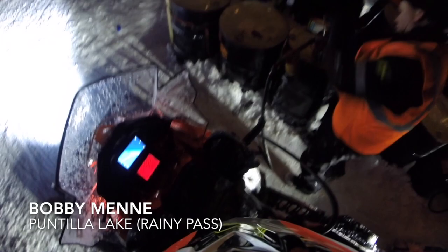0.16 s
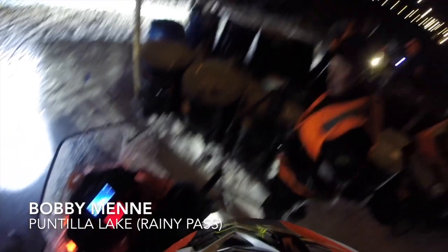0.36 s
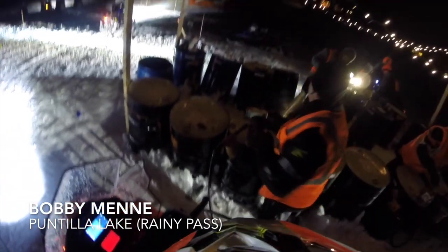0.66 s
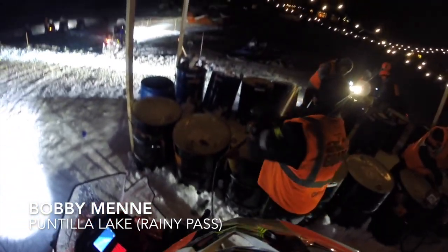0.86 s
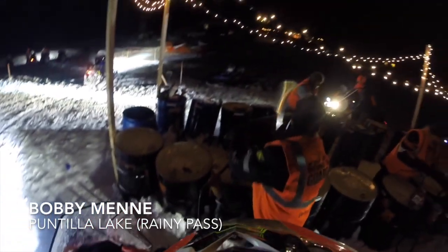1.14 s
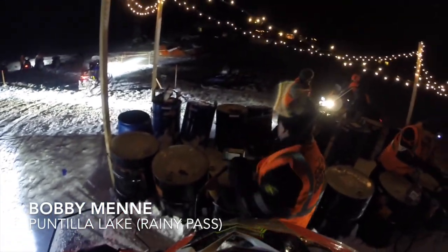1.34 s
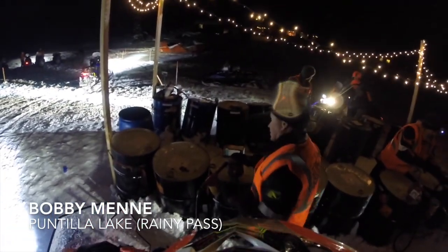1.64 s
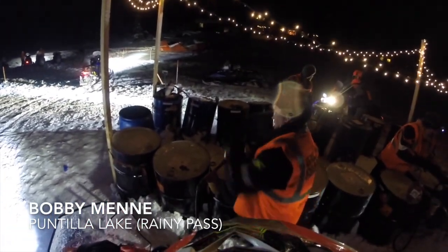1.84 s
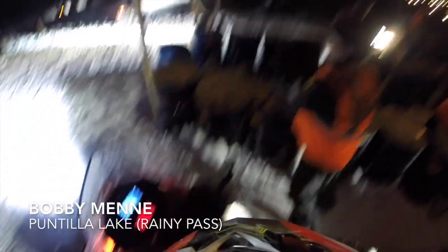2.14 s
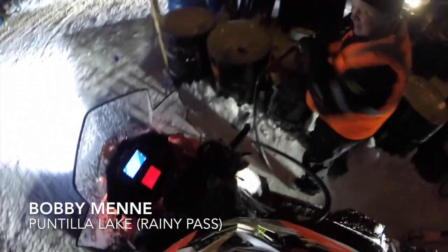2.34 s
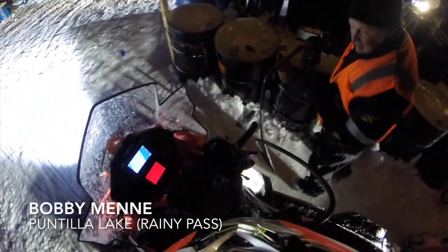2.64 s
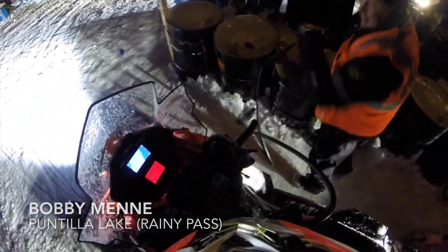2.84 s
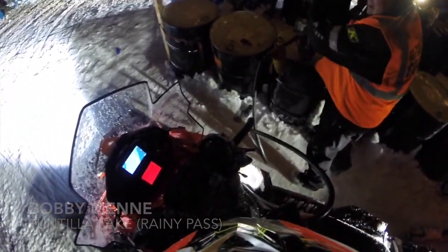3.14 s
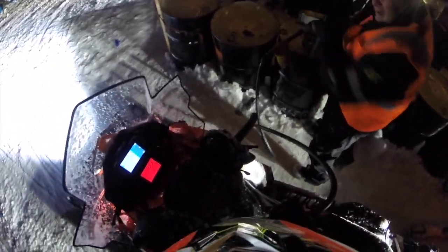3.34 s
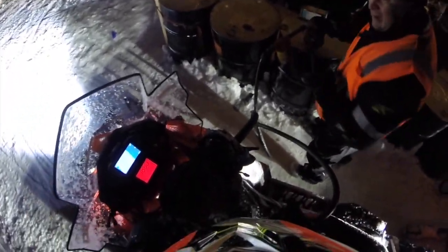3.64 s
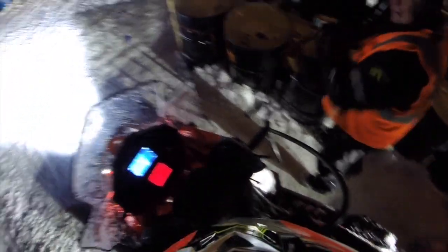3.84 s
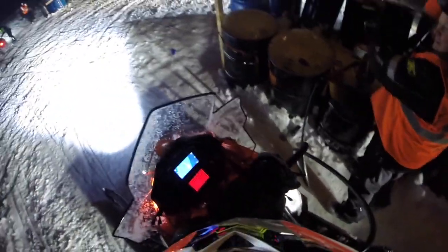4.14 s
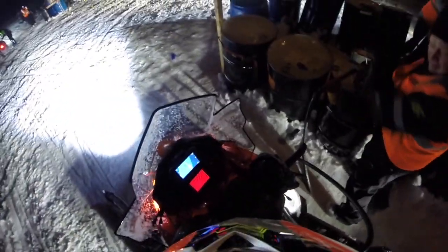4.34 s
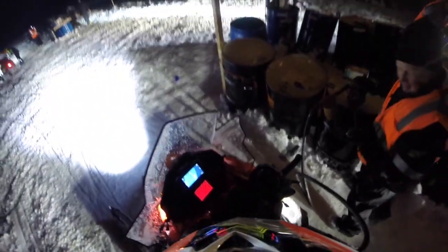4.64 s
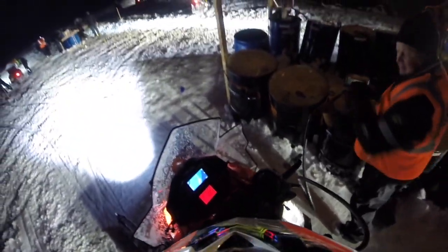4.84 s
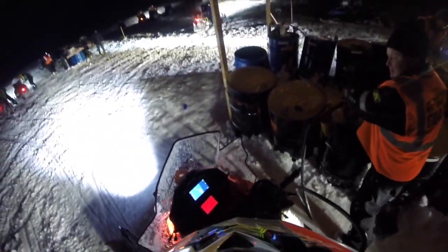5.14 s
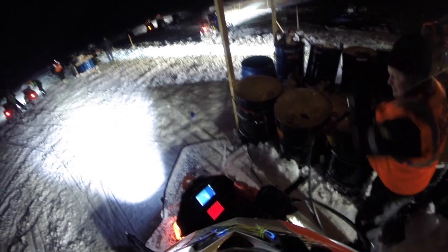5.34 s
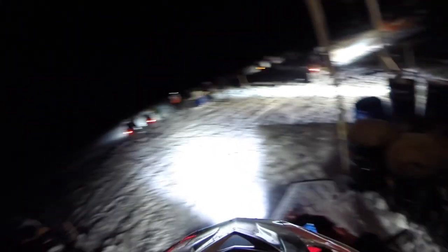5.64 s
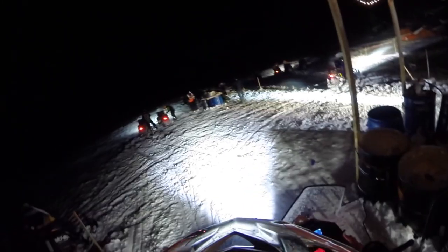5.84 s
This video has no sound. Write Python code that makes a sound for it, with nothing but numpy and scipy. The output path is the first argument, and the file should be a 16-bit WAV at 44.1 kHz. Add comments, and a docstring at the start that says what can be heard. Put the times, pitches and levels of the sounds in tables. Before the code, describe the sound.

Outdoors on open snow, a snowmobile idles steadily right below a body-worn microphone: low uneven putter, fine metallic clatter, rushing air. The hum dips and returns as the wearer's head turns. Hollow knocks hit the camera mount, a hard double metal clank rattles just after two seconds, and tiny clicks and cloth rustles are scattered over it. Dry, no echo.

```python
"""At a fuel stop on the snow at night, a snowmobile idles, heard from a camera worn by its rider.
Puffs and tones make its exhaust, taps on metal its clatter and shaped noise its rushing air; another machine drones
farther off as two wavering tones. Fading tones make hollow knocks on the camera mount, a metal clank and rattle by
the fuel drums, and clicks of small fittings. Crackling noise is clothing; a thin whistle is the camera's electronics."""
import sys
import numpy as np
from scipy import signal
from scipy.fft import rfft, irfft
from scipy.io import wavfile

SR = 44100
rng = np.random.default_rng(int(sys.argv[2]) if len(sys.argv) > 2 else 0)


def generate_wav(sig):
    """Save sig (samples, or channels by samples) to the path in sys.argv[1] as 16-bit PCM at SR."""
    pcm = np.round(np.clip(np.atleast_2d(sig).T, -1, 1) * 32767).astype(np.int16)
    wavfile.write(sys.argv[1], SR, pcm)


N = 264159
TIME = np.arange(N) / SR   # [s]

# idle speed of the crankshaft, before its small wander: (time [s], speed [turns per s])
CRANK_SPEED = [(0.0, 27.4), (0.2, 27.5), (0.65, 28.4), (1.6, 28.7), (2.4, 27.2), (2.7, 29.1), (3.2, 27.4),
               (4.5, 27.7), (5.1, 26.7), (5.6, 27.5), (5.99, 27.4)]
# how far the rider's head is turned down towards the engine: (time [s], share [0-1])
HEAD_FACING = [(0, 0.93), (.2, 1), (.5, 0.66), (1.25, 0.0), (1.52, 0.62), (1.95, 0.14), (2.25, 1),
               (2.65, 0.63), (3.15, .95), (4.0, 0.79), (5.2, 0.47), (5.99, 0)]
# clean exhaust tones, relative: (multiple of crank speed [-], level [dB])
EXHAUST_TONES = [(1, -12), (2, -5.5), (4, -12), (5, -16), (7, -29.5), (8, -38.5), (10, -18.5)]
# pipe and hood resonances, relative: (frequency [Hz], width [Hz], level [dB])
PIPE_RESONANCES = [(52.4, 14.3, -2), (128, 31.4, -1), (220, 47, -14), (273, 28, -11), (423.5, 17.5, -15),
                   (559, 38, -22), (878, 61, -21), (1107, 33, -16.5)]
# engine block and clutch resonances, relative: (frequency [Hz], width [Hz], level [dB])
BLOCK_RESONANCES = [(1416, 110, -4.5), (1575, 114, 2), (2040, 27, -7), (2250, 460, -6.5), (2503, 320, -10),
                    (3043, 110, -7), (3340, 184, -7.5), (3530, 110, -11), (5490, 430, -19),
                    (5900, 346, -18), (5960, 140, -26.5)]
# colour of the air from fan, belt and intake, relative: (frequency [Hz], level [dB per Hz])
RUSH_COLOUR = [(20, 6), (40, -4), (100, -3.5), (200, -8.5), (350, -20.5), (750, -20), (1250, -18),
               (2400, -9), (3400, -26.5), (4200, -21), (6200, -31.5), (7500, -30.5), (10000, -32.5),
               (12500, -42), (15000, -42)]
# drone of the farther machine, before its swell: (frequency [Hz], level [dB rms])
FAR_DRONE = [(38.2, -58), (76.4, -57.5)]
# movements of stiff winter clothing, relative: (time of the middle [s], level [dB])
CLOTH_RUBS = [(1.42, -53), (2.143, -49), (3.026, -51.5), (3.225, -51), (3.285, -49.5), (4.0, -52),
              (4.56, -53), (4.725, -51)]
# colour of the clothing, relative: (frequency [Hz], level [dB per Hz])
CLOTH_COLOUR = [(300, 4), (900, 5.5), (1500, -1.5), (2500, 11), (3400, -1), (4300, -14), (6000, -14.5),
                (10000, -20.5), (15000, -30)]
# clicks of small fittings, relative: (time [s], level [dB], pitch [Hz], time to fall 60 dB [s])
FITTING_CLICKS = [(.056, -44, 3060, .11), (.1355, -36, 2280, 0.022), (.598, -46.5, 5700, .02),
                  (.659, -42.5, 3100, .11), (.815, -44, 3260, 0.053), (1.405, -51, 6640, .018),
                  (1.850, -38.5, 3387, 0.058), (2.344, -35, 2690, 0.023), (2.548, -40.5, 2490, .018),
                  (2.711, -45, 6020, .018), (3.209, -38.5, 2310, 0.067), (3.653, -41, 3090, 0.05),
                  (3.891, -41, 3520, 0.031), (5.316, -41, 3450, 0.12), (5.329, -47, 2514, .44)]
# bumps on the camera mount, relative: (time [s], level [dB])
MOUNT_BUMPS = [(0.138, -12.5), (2.091, -36), (2.241, -15), (2.713, -16.5), (3.197, -16), (3.428, -37),
               (3.849, -19), (4.478, -37), (4.503, -31), (5.405, -36.5)]
# ringing modes of the mount; a weaker one close to the main one lingers and beats:
# (multiple of the mount's pitch [-], level [dB], multiple of the knock's fall time [-])
MOUNT_MODES = [(.32, -23, 1.2), (.99, -2, 1.05), (1.07, -14, 2.2), (1.54, -16, 1.3)]
# blows of the clank, two hard and two light, relative: (time [s], level [dB], brightness [Hz])
CLANK_BLOWS = [(2.1975, -22, 1990), (2.221, -26.5, 4300), (2.2773, -38, 4800), (2.316, -49, 3800)]
# ringing modes of the struck metal, relative: (frequency [Hz], level [dB], time to fall 60 dB [s])
METAL_MODES = [(415, -19, .4), (495, -17, .35), (615, -5, .3), (876, -8, .25), (905, -16, 1.0),
               (1101, -14, .35), (1350, -16, .4), (1523, -4, .15), (1612, -5, .18), (1679, -1, .22),
               (1716, -4, .22), (1878, -10, .3), (2003, -9, .22), (2125, -9, .25), (2255, -5, .25),
               (2308, -2, .26), (2358, -7, .3), (2504, -7, .25), (2590, -7, .27), (2708, -8, .28),
               (2802, -7, .33), (3122, -13, .2), (3289, -9, .09), (3390, -15, .2)]
# colour of its dense upper modes, relative: (frequency [Hz], level [dB per Hz])
CRASH_COLOUR = [(250, -8), (500, -8), (1200, -6), (1700, 2), (2600, 3.5), (3400, -6.5), (4200, -18.5),
                (6000, -17.5), (10000, -13), (15000, -16)]

SPEED_WANDER_SHARE, SPEED_WANDER_HZ = .005, 6.0   # the idle hunts around its set speed
# gains facing the engine, and what each loses when the head is fully turned away
EXHAUST_DB, EXHAUST_AWAY_DB = -48.5, 0.25
HUM_DB, HUM_AWAY_DB = -56, 20.5
CLATTER_DB, CLATTER_AWAY_DB = -49, 5
RUSH_DB, RUSH_AWAY_DB = -54, 2.6
WHINE_HZ, FRAME_HZ = 6450, 30
RUSTLE_HALF_S, STIR_DB = 0.022, -69   # half-width of a rustle; middle level of the faint stirring
OVERTONE_RATIO, OVERTONE_DB = 2.07, -16.0   # second mode of each fitting
FAINT_DB, FAINT_T60_S, FAINT_LOW_HZ, FAINT_HIGH_HZ = -52, 0.04, 2150, 6500
MOUNT_HZ = 122.8
HARD_KNOCK_DB, HARD_KNOCK_T60_S = -15.5, 0.087   # the mount's padding damps hard bumps quickly
RING_DOUBLING_DB = 20.5   # a bump this much softer rings twice as long
REBOUND_S, REBOUND_LOSS_DB = .122, 25   # the camera settles back after each bump
BOUNCE_S, BOUNCE_GAIN_DB = .0055, 1.5   # each blow lands again, a little louder
RATTLE_GAP_S, RATTLE_BELOW_DB, RATTLE_BRIGHT_HZ = 0.03, 28, 4500   # then come light touches
CUTOFF_HZ = 15200


def from_db(db):
    """Turn decibels into a multiplier."""
    return 10 ** (np.asarray(db) / 20)


def rms_one(x):
    """Scale to an rms (average strength) of 1."""
    return x / np.sqrt(np.mean(x ** 2) + 1e-20)


def in_time(rows):
    """Draw straight lines between a table's rows, sample by sample."""
    s, *columns = np.transpose(rows)
    return [np.interp(TIME, s, c) for c in columns]


def drift(rate):
    """Random wander with rms 1; a higher rate [Hz] wanders faster."""
    step = 40   # work on every 40th sample, then fill in between
    r = np.exp(-2 * np.pi * rate * step / SR)
    noise = rng.standard_normal(N // step + 2002)
    slow = signal.lfilter([1], [1, -2 * r, r * r], noise)[2000:]   # drop the start-up
    return np.interp(np.arange(N) / step, np.arange(len(slow)), rms_one(slow))


def coloured(spectrum):
    """Steady noise with the given balance of low and high, rms 1."""
    hz, db = np.transpose(spectrum)
    bins = np.maximum(np.fft.rfftfreq(N, 1 / SR), 1)
    gain = from_db(np.interp(np.log(bins), np.log(hz), db))
    gain = gain * np.minimum(bins / hz[0], 1) ** 2   # fade out below the first row
    return rms_one(irfft(rfft(rng.standard_normal(N)) * gain, N))


def resonate(x, hz, width):
    """Let a resonance ring, with gain 1 at its peak."""
    r = np.exp(-np.pi * width / SR)
    top = np.array([1, 0, -1]) * (1 - r * r) / 2
    return signal.lfilter(top, [1, -2 * r * np.cos(2 * np.pi * hz / SR), r * r], x + 1e-18)


def low_pass(x, hz, order=2):
    """Soften what lies above hz."""
    return signal.sosfilt(signal.butter(order, min(hz, .45 * SR), fs=SR, output="sos"), x)


def band_pass(x, low_hz, high_hz):
    """Keep mainly what lies between two frequencies."""
    band = [low_hz, min(high_hz, .45 * SR)]
    return signal.sosfilt(signal.butter(2, band, "band", fs=SR, output="sos"), x)


def dying(t, t60):
    """Fade that falls 60 dB in t60 seconds."""
    return np.exp(-np.log(1000) * t / t60)


def add(out, s, sound):
    """Mix a short sound in at time s."""
    i = round(s * SR)
    out[i:i + len(sound)] += sound[:N - i]


def exhaust(turns, uneven_db=1.5, turbulence=0.25, pulses_db=-3.0, waver_db=2.0):
    """Two firings a turn, of uneven strength, puff into the ringing pipe beside clean tones."""
    firing = np.diff(np.floor(2 * turns + .05 * drift(25)), prepend=0) > 0
    strength = from_db(uneven_db * drift(23.6))
    puff = np.exp(-1.5 * (2 * turns % 1))
    pipe = np.zeros(N)
    for hz, width, db in PIPE_RESONANCES:
        gas = strength * (firing + turbulence * puff * rng.standard_normal(N))
        pipe += from_db(db) * resonate(gas, hz, width)
    tones = np.zeros(N)
    for k, db in EXHAUST_TONES:
        level = from_db(db + waver_db * drift(2.2))
        tones += level * np.sqrt(2) * np.sin(2 * np.pi * (k * turns + rng.random()))
    return from_db(pulses_db) * rms_one(low_pass(pipe, hz=1440)) + tones


def airbox(turns, order=14):
    """The seventh harmonic of the firing rate hums, wavering with uneven firing times and strengths."""
    lead = .17 * drift(12)   # [cycles]
    waver_db = 3 * drift(14) - 1.5
    return from_db(waver_db) * np.sqrt(2) * np.sin(2 * np.pi * (order * turns + lead))


def clatter(turns, taps_per_s=3500, throb=0.17, flutter_db=1.5):
    """Valve gear and clutch tap densely on the ringing block, harder once a turn."""
    taps = rng.random(N) < taps_per_s / SR
    force = taps * (1 + throb * np.cos(2 * np.pi * turns)) * from_db(flutter_db * drift(4.2))
    block = np.zeros(N)
    for hz, width, db in BLOCK_RESONANCES:
        ring = resonate(force * rng.standard_normal(N), hz, 1.1 * width)
        block += from_db(db) * resonate(ring, hz, 4 * width)
    return rms_one(block)


def rush(turns, throb=0.17, flutter_db=1.0):
    """Air from fan, belt and intake rushes as noise, pulsing with the firings."""
    pulsing = 1 + throb * np.cos(4 * np.pi * turns)
    return coloured(RUSH_COLOUR) * pulsing * from_db(flutter_db * drift(18))


def snowmobile():
    """The crank drives every engine sound; each fades by its own amount as the rider looks away."""
    speed = in_time(CRANK_SPEED)[0] * (1 + SPEED_WANDER_SHARE * drift(SPEED_WANDER_HZ))
    turns = np.cumsum(speed) / SR
    away = 1 - in_time(HEAD_FACING)[0]
    return (from_db(EXHAUST_DB - EXHAUST_AWAY_DB * away) * exhaust(turns)
            + from_db(HUM_DB - HUM_AWAY_DB * away) * airbox(turns)
            + from_db(CLATTER_DB - CLATTER_AWAY_DB * away) * clatter(turns)
            + from_db(RUSH_DB - RUSH_AWAY_DB * away) * rush(turns))


def far_machine(waver=0.0134, swell_db=6.5):
    """Only the wavering drone of the other engine carries across the snow."""
    clock = np.cumsum(1 + waver * drift(2.05)) / SR
    drone = sum(from_db(db) * np.sqrt(2) * np.sin(2 * np.pi * hz * clock) for hz, db in FAR_DRONE)
    return from_db(swell_db * drift(2.9)) * drone


def camera_whine(low_db=-72.0, high_db=-79.5):
    """The electronics give an unsteady whistle and its octave, pulsing with the frame rate."""
    phase = 2 * np.pi * np.cumsum(WHINE_HZ + 22 * drift(68.0)) / SR
    frame = 2 * np.pi * FRAME_HZ * TIME
    pulsing = 1 + .55 * np.cos(frame) - .25 * np.cos(2 * frame) - .45 * np.cos(3 * frame)
    return pulsing * (from_db(low_db) * np.sin(phase) + from_db(high_db) * np.sin(2 * phase))


def clothing(level_db=-1.0, stir_swing_db=4.5):
    """Each movement rubs out a short swell of fine crackle; the cloth stirs faintly throughout."""
    swell = sum(from_db(db) * np.exp(-2 * ((TIME - s) / RUSTLE_HALF_S) ** 2) for s, db in CLOTH_RUBS)
    stir = from_db(STIR_DB + stir_swing_db * drift(4.7))
    crackle = rms_one(coloured(CLOTH_COLOUR) * from_db(3 * drift(200)))
    return (from_db(level_db) * swell + stir) * crackle


def faint_clicks(count=10):
    """Small clicks at random times and pitches, as rows like those of FITTING_CLICKS."""
    rows = []
    for when, pitch in rng.random((count, 2)):
        hz = FAINT_LOW_HZ * (FAINT_HIGH_HZ / FAINT_LOW_HZ) ** pitch
        rows.append((when * TIME[-1], FAINT_DB, hz, FAINT_T60_S))
    return rows


def fittings(snap_t60=0.052, ring_db=1.5, snap_db=-6.0, snap_loss_db=2.0, contact_s=0.0005, buzz=0.41,
             top_hz=7500):
    """A small part snaps, rings and buzzes in its loose seat; the longer it rings, the less it snaps."""
    out, t = np.zeros(N), TIME[:SR // 4]
    for s, db, hz, t60 in list(FITTING_CLICKS) + faint_clicks():
        grit, chatter = rng.standard_normal((2, len(t)))
        buzzing = buzz * rms_one(resonate(chatter, hz, 240))
        tone = (np.sin(2 * np.pi * hz * t) + buzzing) * dying(t, t60)
        overtone = from_db(OVERTONE_DB) * np.sin(2 * np.pi * OVERTONE_RATIO * hz * t) * dying(t, t60 / 2)
        snap_gain = from_db(snap_db - snap_loss_db * np.log2(t60 / snap_t60))
        snap = rms_one(band_pass(grit, 0.63 * hz, 1.05 * hz)) * dying(t, snap_t60) * snap_gain
        click = from_db(ring_db) * (tone + overtone) + low_pass(snap, top_hz)
        add(out, s, from_db(db) * click * (1 - np.exp(-t / contact_s)))
    return out


def knocks(swell_s=0.011, level_db=6.5):
    """A bump swells the mount's modes into ringing, and a soft rebound follows it."""
    out, t = np.zeros(N), TIME[:SR]
    bumps = list(MOUNT_BUMPS)
    for s, db in MOUNT_BUMPS:
        delay = REBOUND_S * (1 + 0.0872 * rng.standard_normal())
        bumps.append((s + delay, db - REBOUND_LOSS_DB))
    for s, db in bumps:
        t60 = HARD_KNOCK_T60_S * 2 ** ((HARD_KNOCK_DB - db) / RING_DOUBLING_DB)
        mount = sum(from_db(mode_db) * np.sin(2 * np.pi * ratio * MOUNT_HZ * t) * dying(t, lasting * t60)
                    for ratio, mode_db, lasting in MOUNT_MODES)
        add(out, s, -from_db(db + level_db) * mount * (1 - np.exp(-t / swell_s)))
    return out


def contacts(count=3):
    """Every blow with its bounce and uneven rattle, as rows like those of CLANK_BLOWS."""
    rows = []
    for s, db, bright_hz in CLANK_BLOWS:
        rows += [(s, db, bright_hz), (s + BOUNCE_S, db + BOUNCE_GAIN_DB, bright_hz)]
        delays = np.cumsum(RATTLE_GAP_S * (.5 + rng.random(count)))
        rows += [(s + delay, db - RATTLE_BELOW_DB, RATTLE_BRIGHT_HZ) for delay in delays]
    return rows


def clank(modes_db=-14.5, crash_db=-0.5, crash_t60=0.011, tail_db=-20.5, tail_t60=0.49):
    """Each contact rings the metal anew, with a short gritty crash that scatters among the drums."""
    out, t = np.zeros(N), TIME[:SR]
    crash = rms_one(coloured(CRASH_COLOUR) * from_db(2.5 * drift(250)))
    fade = from_db(crash_db) * dying(t, crash_t60) + from_db(tail_db) * dying(t, tail_t60)
    for s, db, bright_hz in contacts():
        modes = np.zeros(len(t))
        for hz, mode_db, t60 in METAL_MODES:
            level = from_db(mode_db + rng.standard_normal())   # no two contacts excite it alike
            modes += level * np.sin(2 * np.pi * (hz * t + rng.random())) * dying(t, t60)
        blow = from_db(modes_db) * modes + fade * crash[round(s * SR):][:SR]
        # a low brightness sounds dull, a high one thin
        add(out, s, from_db(db) * band_pass(blow, bright_hz / 10, bright_hz))
    return out


def scene():
    """Open snow gives no reverberation; all sources add at one microphone."""
    engines = snowmobile() + far_machine()
    small_sounds = camera_whine() + clothing() + fittings()
    return (engines + small_sounds + knocks() + clank())[None]


def record(dry):
    """Cut the top steeply above CUTOFF_HZ."""
    return signal.sosfilt(signal.ellip(12, .1, 80, CUTOFF_HZ, fs=SR, output="sos"), dry)


dry = scene()
out = record(dry)
generate_wav(out)
```